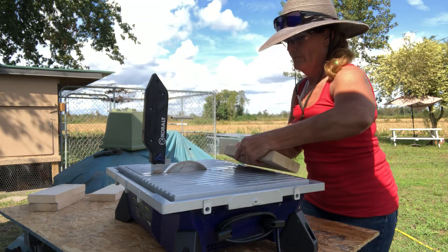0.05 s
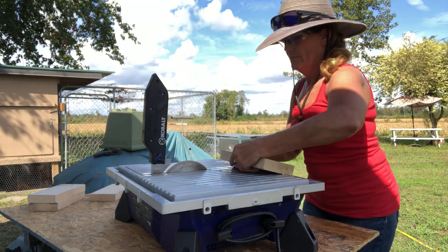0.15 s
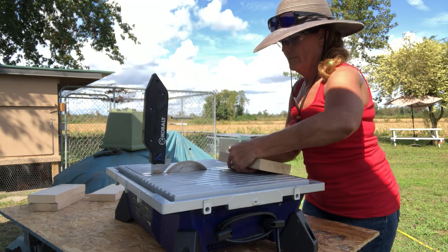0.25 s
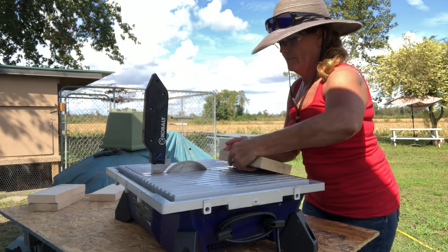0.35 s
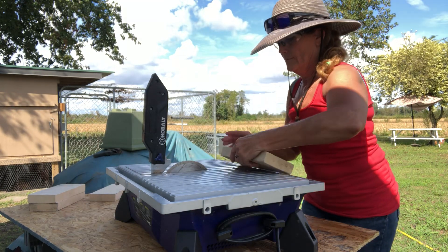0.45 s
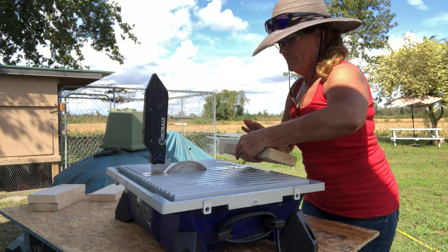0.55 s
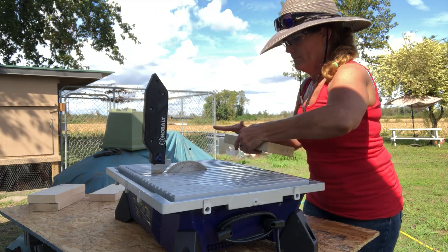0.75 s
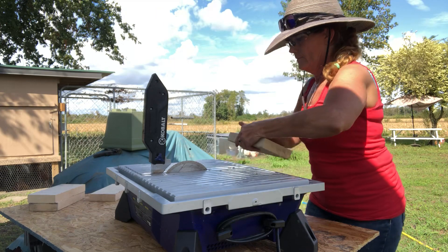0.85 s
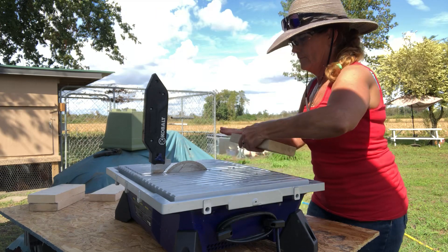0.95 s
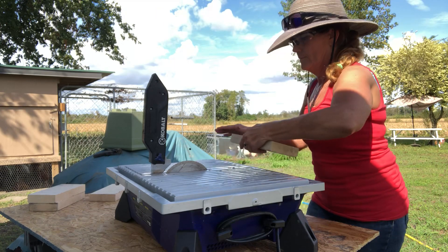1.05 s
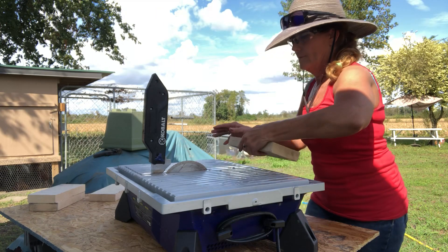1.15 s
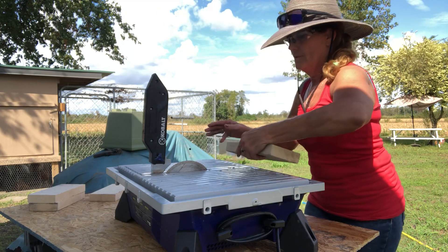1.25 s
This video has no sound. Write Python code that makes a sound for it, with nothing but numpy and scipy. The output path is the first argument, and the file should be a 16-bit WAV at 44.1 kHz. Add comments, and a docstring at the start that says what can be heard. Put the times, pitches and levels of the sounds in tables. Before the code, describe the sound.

Firebrick clunks onto a metal table with a gritty double knock, followed by quiet brick handling.

```python
"""Outdoors, a faint scrape and squeaks on metal, then a cut firebrick lands on a stopped tile saw's table.
It lands edge first, then flat, and slides a little: filtered damped modes and noise boom as table and housing,
with noise cracks for the grit and coloured random grains for the scrape.
Lifted again, the two pieces clink on bright damped modes, rub together as grains, clink dully and
bump softly in the hands as short low tones. Steady coloured noise is the quiet open air throughout."""
import sys
import numpy as np
from scipy import signal
from scipy.fft import rfft, irfft
from scipy.io import wavfile

SR = 44100
rng = np.random.default_rng(int(sys.argv[2]) if len(sys.argv) > 2 else 0)


def digitize_waveform(pressure):
    """Quantize a signal to 16-bit integers and store it at the path in sys.argv[1].

    Rows of a 2-D input are taken as channels; values are limited to [-1, 1].
    """
    field = np.atleast_2d(pressure).T
    bounded = np.clip(field, -1, 1)
    quanta = np.round(bounded * 32767).astype(np.int16)
    wavfile.write(sys.argv[1], SR, quanta)


N = 57330
T = np.arange(N) / SR  # time [s]

# Brick on table: (time [s], level [dB], low-pass of the contact [Hz], level of the gritty crack [dB])
KNOCKS = [(0.2006, -27, 1200, -37.5), (0.2072, -21, 703, -44.5), (0.2249, -22, 2380, -28),
          (0.2395, -45.5, 800, -42.5), (0.284, -34, 740, -69), (0.302, -41, 1100, -52),
          (0.392, -48, 1240, -53), (0.405, -49, 1210, -47)]
# Ringing modes of table and housing: (frequency [Hz], level [dB], T60 [s])
TABLE_MODES = [(153, -21, 0.54), (176.7, -19, 0.26), (227, -20.5, 0.77), (249, -12, 0.41),
               (282.6, -13.5, 0.34), (360, -9.5, 0.22), (464, -5.5, 0.067), (484, -14, 0.83),
               (546.3, -1.5, 0.19), (730, -10, 0.11), (808.6, -7.5, 0.18), (1134, -13, 0.15),
               (1252, -13, 0.073), (1442, -8.5, 0.13), (1704, -6, 0.073), (2320, -27.5, 0.52),
               (2520, -13, 0.17)]
# Their many small modes, heard as a wash: (frequency [Hz], density [dB per Hz], T60 [s])
TABLE_WASH = [(50, -30, .35), (110, -12, 0.28), (226, -10, 0.29), (550, 0.5, 0.14), (950, -11.5, .17),
              (1790, -15.5, 0.13), (2080, -34, .22), (2710, -12.5, 0.086), (5070, -15.5, 0.14),
              (12000, -29, .14)]
WASH_DB, TABLE_BUILD_S = 2, 0.00087
TABLE_LOW_HZ = 140  # the table radiates little below this
PUNCH_DB, PUNCH_T60_S = -1.5, 0.024  # the first swings, before the blow spreads through the housing
MODE_SPREAD_DB = 1.5  # uneven mode strengths from knock to knock
# Colour of crushed grit: (frequency [Hz], density [dB per Hz])
CRACK_COLOUR = [(500, -24), (1500, 9), (2000, 2), (3800, 0), (5200, -3), (6800, -13), (10000, -15),
                (16000, -23.5)]
CRACK_RISE_S, CRACK_T60_S = 0.00041, 0.052

# Sliding on the table: (start [s], length [s], level [dB], swell [s])
SLIDES = [(-0.01, 0.091, -52.5, 0.0053), (0.245, 0.069, -46, 0.0071), (0.362, 0.038, -49.5, 0.025)]
# Colour of the slide: (frequency [Hz], density [dB per Hz])
SLIDE_COLOUR = [(30, -26.5), (70, -1), (120, 2.5), (230, 6.5), (450, -9), (800, -6), (1600, -3), (2000, -7),
                (2400, -6.5), (4500, -12.5), (6500, -18), (10000, -26.5), (16000, -33)]
SLIDE_RING_DB = -9.5  # scraping keeps the table's modes ringing
# Faint squeaks of the sliding edge: (start [s], length [s], level [dB], swell [s])
SQUEAKS = [(0.002, 0.026, -52, 0.0036), (0.093, 0.016, -59.5, 0.0025), (0.126, 0.011, -64.5, .006)]
SQUEAK_HZ, SQUEAK_WIDTH_HZ = 1027, 59
GRAINS_PER_S, GRAIN_SPREAD_DB = 6000, 3

# Piece against piece: (time [s], level [dB], low-pass of the contact [Hz])
CLINKS = [(0.6354, -30.5, 15000), (0.98, -47.5, 1730)]
# Ringing modes of the brick: (frequency [Hz], level [dB], T60 [s])
BRICK_MODES = [(1054, -23, 0.078), (1837, -9, 0.33), (2312, -2.5, 0.16), (2450, -7, 0.021),
               (4400, -33, 0.57), (4603, -15, 0.11), (6740, -21, 0.1), (7060, -27, 0.43), (7660, -20, 0.31),
               (7970, -16.5, 0.2), (10230, -24, 0.042), (11830, -13, 0.048), (14670, -15, .03)]
CLINK_TICK_DB, CLINK_TICK_T60_S = -11, 0.042
CHOKE_AFTER_S, CHOKE_FADE_S, CHOKE_DB = 0.0093, 0.0018, 6  # the faces close and take energy out of the ring

# Brick face on brick face: (start [s], length [s], level [dB], swell [s])
RUBS = [(0.648, 0.041, -54.5, 0.022), (0.932, 0.043, -52.5, 0.016), (1.018, 0.2, -70.5, 0.0027),
        (1.135, 0.028, -67, 0.03)]
# Colour of the rub: (frequency [Hz], density [dB per Hz])
RUB_COLOUR = [(300, 0), (1200, -6.5), (1850, 3), (2800, 3.5), (3700, 6), (5500, 2.5), (7500, -0.5),
              (10000, -6.5), (16000, -11)]
# Hands shifting their grip: (start [s], length [s], level [dB], swell [s])
GRIPS = [(0.875, 0.1, -64, 0.012), (1.015, 0.11, -56, 0.0047), (1.135, 0.075, -54.5, .02),
         (1.225, 0.059, -60, 0.022)]
# Colour of the grip: (frequency [Hz], density [dB per Hz])
GRIP_COLOUR = [(30, -40), (70, 5.5), (150, -1.5), (290, 6), (450, -3), (850, -13.5), (1300, -8),
               (2500, -13.5), (5000, -16), (16000, -32.5)]
# Grit catching between the pieces: (time [s], level [dB], pitch [Hz])
CATCHES = [(0.033, -48.5, 1670), (1.0751, -46.5, 2360), (1.175, -48.5, 5600)]
# Colour of a catch, shared by the clink's tick: (frequency [Hz], density [dB per Hz])
CATCH_COLOUR = [(60, -2), (400, 2.5), (1200, 1.5), (2400, 7), (4000, -1.5), (8000, -1.5), (16000, -8.5)]
CATCH_T60_S, CATCH_Q, CATCH_RING_DB = 0.045, 4, 5
# Dull bumps of the handled brick: (time [s], level [dB], pitch [Hz], T60 [s])
BUMPS = [(0.556, -54.5, 555, 0.11), (0.938, -50.5, 410, 0.032), (1.019, -55, 634.3, 0.29),
         (1.0502, -36, 347, 0.056), (1.148, -45.5, 639, 0.042), (1.155, -50.5, 283, .13),
         (1.198, -52.5, 264, 0.21)]
BUMP_OVERTONE, BUMP_OVERTONE_DB, BUMP_RISE_S = 1.7, -10.5, 0.00056  # overtone as a multiple of the pitch

# Colour of the open air: (frequency [Hz], density [dB per Hz])
AIR_COLOUR = [(25, -24), (65, 4.5), (130, -1), (260, 1.5), (480, -1), (800, -9), (1500, -14), (3000, -15.5),
              (6000, -17.5), (7800, -15.5), (10000, -22.5), (16000, -28)]
AIR_DB = -67
CUTOFF_HZ = 15800


def from_db(db):
    """Decibels to gain."""
    return 10 ** (np.asarray(db) / 20)


def rms_one(x):
    """Scale to unit rms."""
    return x / np.sqrt(np.mean(x ** 2) + 1e-20)


def filtered(x, order, hz, kind="low"):
    """Butterworth filter."""
    return signal.sosfilt(signal.butter(order, hz, kind, fs=SR, output="sos"), x)


def at_hz(points, hz, axis=1):
    """Read a column of a table on a log-frequency axis."""
    points = np.array(points)
    return np.interp(np.log(hz + 1), np.log(points[:, 0]), points[:, axis])


def coloured(spectrum, x):
    """Give a steady signal a spectrum; rms 1."""
    gain = from_db(at_hz(spectrum, np.fft.rfftfreq(N, 1 / SR)))
    return rms_one(irfft(rfft(x) * gain, N))


def noise(spectrum):
    """Steady noise with a spectrum; rms 1."""
    return coloured(spectrum, rng.standard_normal(N))


def swing_up(rise):
    """Exponential approach to full level."""
    return 1 - np.exp(-T / rise)


def dying(t60, rise=1 / SR):
    """Quick rise, exponential decay."""
    return from_db(-60 * T / t60) * swing_up(rise)


def at(s, x):
    """Delay a sound to its moment."""
    return np.concatenate([np.zeros(int(s * SR)), x])[:N]


def ring(modes, spread_db=0):
    """One blow on a set of damped modes of alternating sign, their strengths varied by the spread."""
    out = np.zeros(N)
    for k, (hz, db, t60) in enumerate(modes):
        strength = from_db(db + spread_db * rng.standard_normal())
        out += (-1) ** k * strength * np.sin(2 * np.pi * hz * T) * dying(t60)
    return out


def strokes(rows, release_t60):
    """Envelope of movements: swell, hold, die away."""
    out = np.zeros(N)
    for start, length, db, swell in rows:
        since_end = np.maximum(T - start - length, 0)
        out += from_db(db - 60 * since_end / release_t60) * np.clip((T - start) / swell, 0, 1)
    return out


def friction(spectrum):
    """Dense grains of uneven size breaking loose, over a bed of finer noise."""
    size_db = GRAIN_SPREAD_DB * np.minimum(rng.exponential(1, N), 4)
    sizes = from_db(size_db) * rng.choice([-1, 1], N)
    grains = rms_one(sizes * (rng.random(N) < GRAINS_PER_S / SR))
    return coloured(spectrum, grains + .5 * rng.standard_normal(N))


def knocks():
    """Each landing rings the table through a softer or harder contact and crushes some grit."""
    out = np.zeros(N)
    shape = swing_up(TABLE_BUILD_S) * (1 + from_db(PUNCH_DB) * dying(PUNCH_T60_S))
    for s, db, contact_hz, crack_db in KNOCKS:
        body = ring(TABLE_MODES, spread_db=MODE_SPREAD_DB) + from_db(WASH_DB) * table_wash()
        body = filtered(body * shape, 2, contact_hz)
        crack = noise(CRACK_COLOUR) * dying(CRACK_T60_S, CRACK_RISE_S)
        out += at(s, from_db(db) * body + from_db(crack_db) * crack)
    return filtered(out, 3, TABLE_LOW_HZ, "high")


def table_wash():
    """The crowd of small table modes: noise dying octave by octave."""
    spectrum, hz = rfft(noise(TABLE_WASH)), np.fft.rfftfreq(N, 1 / SR)
    out = np.zeros(N)
    for low in 32 * 2. ** np.arange(10):
        band = irfft(spectrum * (hz >= low) * (hz < 2 * low), N)
        out += band * dying(at_hz(TABLE_WASH, low * np.sqrt(2), axis=2))
    return out


def slides():
    """The brick scrapes in grains over the table and sets its modes ringing, its edge squeaking at first."""
    grains = friction(SLIDE_COLOUR)
    ringing = rms_one(irfft(rfft(grains) * rfft(ring(TABLE_MODES)), N))
    scrape = grains + from_db(SLIDE_RING_DB) * ringing
    return scrape * strokes(SLIDES, release_t60=0.16) + squeak() * strokes(SQUEAKS, release_t60=.07)


def squeak():
    """A tone of wandering pitch: narrow-band noise with its level swings flattened."""
    band = [SQUEAK_HZ - SQUEAK_WIDTH_HZ / 2, SQUEAK_HZ + SQUEAK_WIDTH_HZ / 2]
    narrow = filtered(rng.standard_normal(2 * N), 2, band, "band")[N:]  # first half lets the filter settle
    return rms_one(np.cos(np.angle(signal.hilbert(narrow))))


def clinks():
    """The two pieces touch and ring like pottery, half choked a moment later."""
    choke = from_db(-CHOKE_DB * np.clip((T - CHOKE_AFTER_S) / CHOKE_FADE_S, 0, 1))
    out = np.zeros(N)
    for s, db, contact_hz in CLINKS:
        tick = noise(CATCH_COLOUR) * dying(CLINK_TICK_T60_S)
        sound = ring(BRICK_MODES) * choke + from_db(CLINK_TICK_DB) * tick
        out += from_db(db) * at(s, filtered(sound, 2, contact_hz))
    return out


def handling():
    """The pieces rub and shift in friction grains, catch on grit and bump as the hands turn them."""
    rubs = friction(RUB_COLOUR) * strokes(RUBS, release_t60=0.2)
    grips = friction(GRIP_COLOUR) * strokes(GRIPS, release_t60=0.12)
    catches = sum(from_db(db) * at(s, catch(hz)) for s, db, hz in CATCHES)
    bumps = sum(from_db(db) * at(s, bump(hz, t60)) for s, db, hz, t60 in BUMPS)
    return rubs + grips + catches + bumps


def catch(hz):
    """A short gritty tick with a broad resonance."""
    grit = noise(CATCH_COLOUR)
    tone = rms_one(signal.lfilter(*signal.iirpeak(hz, CATCH_Q, fs=SR), grit))
    return rms_one(grit + from_db(CATCH_RING_DB) * tone) * dying(CATCH_T60_S)


def bump(hz, t60):
    """A dull knock: a damped tone and one overtone, softened at the start."""
    tones = [(hz, 0, t60), (hz * BUMP_OVERTONE, BUMP_OVERTONE_DB, t60)]
    return ring(tones) * swing_up(BUMP_RISE_S)


def air():
    """Quiet open air: steady coloured noise."""
    return from_db(AIR_DB) * noise(AIR_COLOUR)


def scene():
    """Brick and table over quiet open air."""
    return (knocks() + slides() + clinks() + handling() + air())[None]


def record(dry):
    """The top is cut steeply by an elliptic low-pass."""
    return signal.sosfilt(signal.ellip(10, .1, 80, CUTOFF_HZ, fs=SR, output="sos"), dry)


dry = scene()
out = record(dry)
digitize_waveform(out)
```